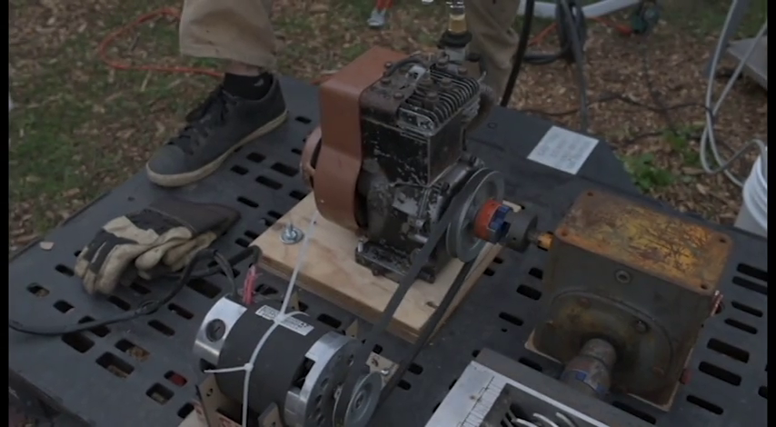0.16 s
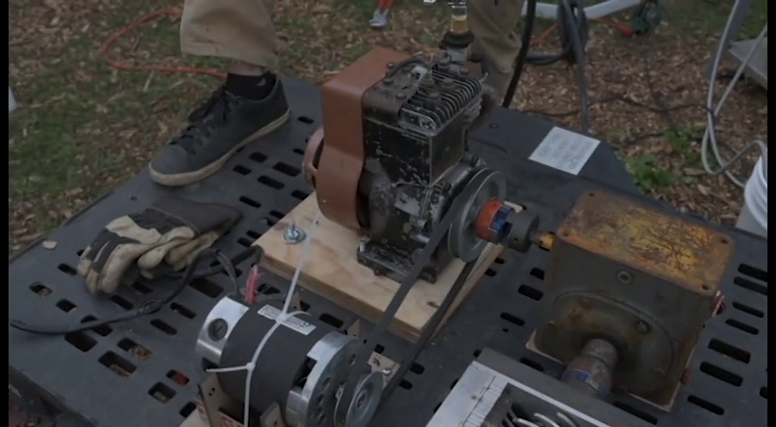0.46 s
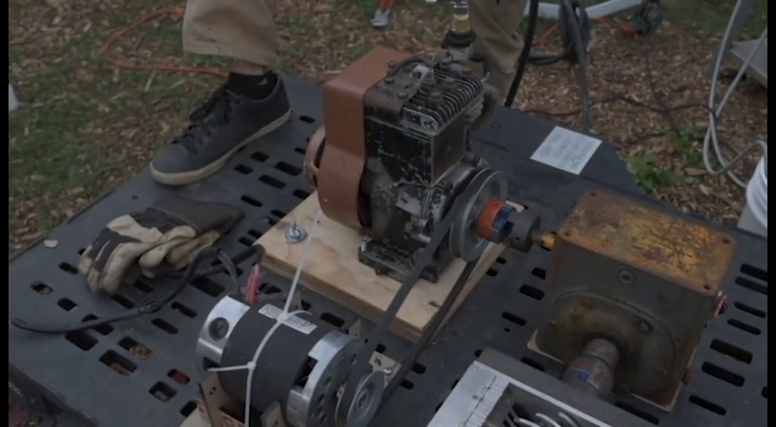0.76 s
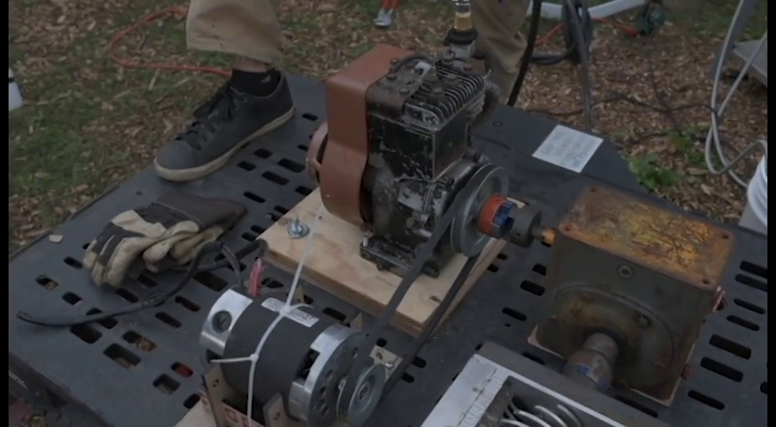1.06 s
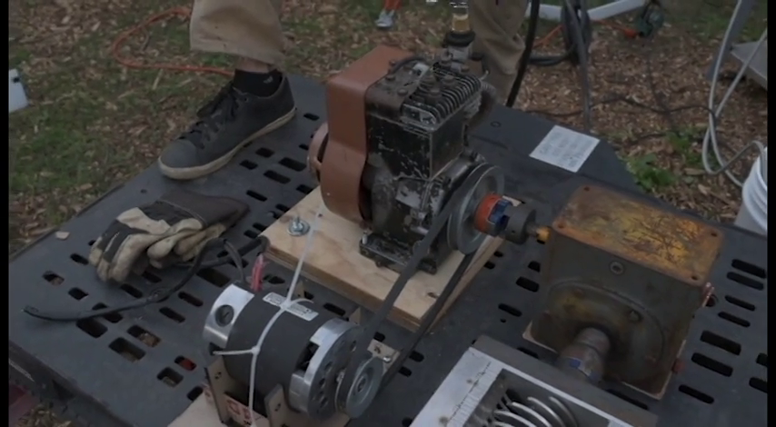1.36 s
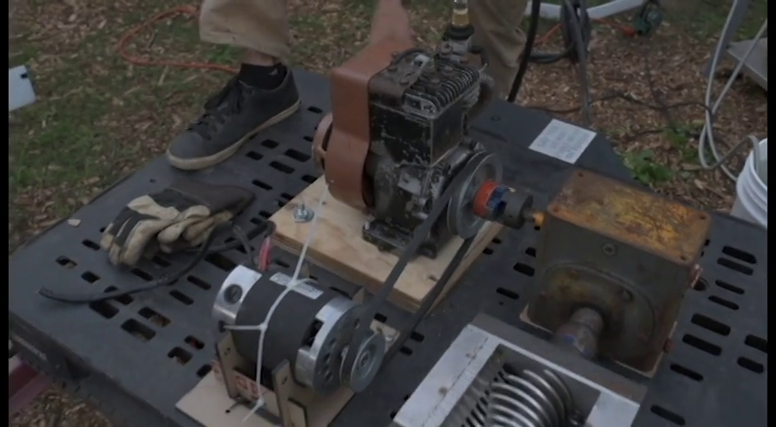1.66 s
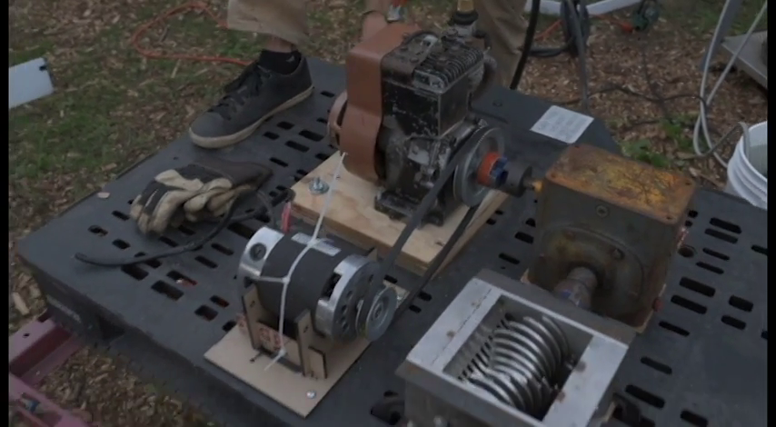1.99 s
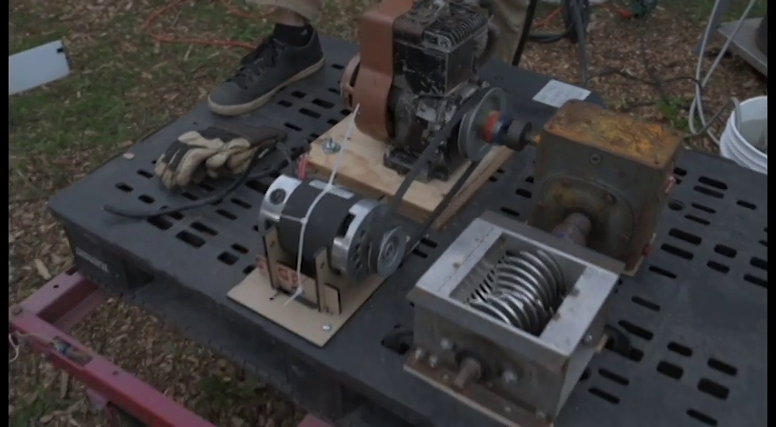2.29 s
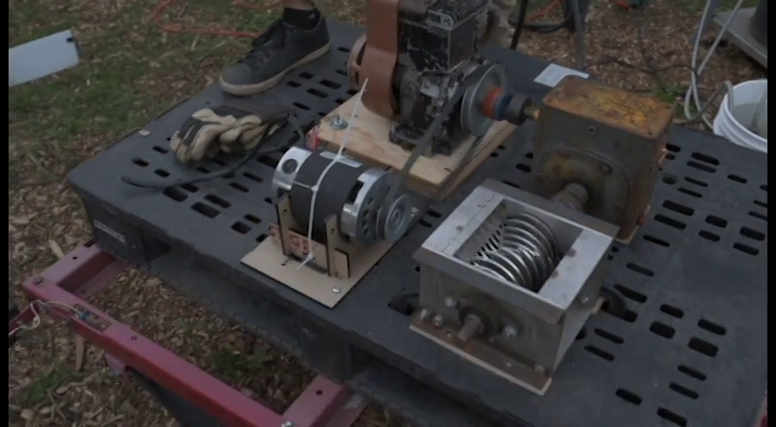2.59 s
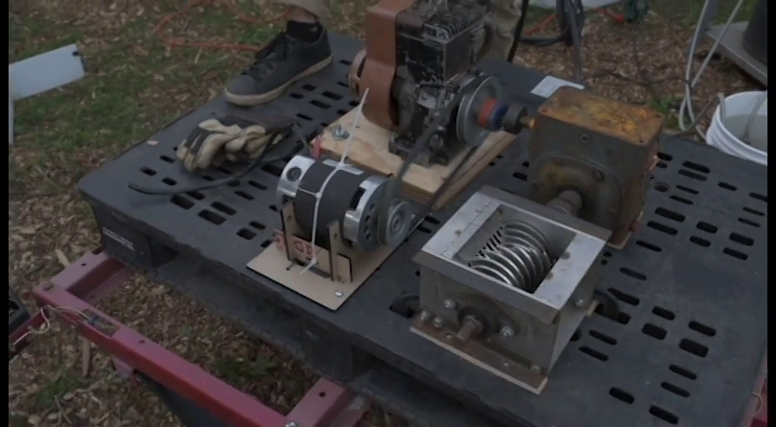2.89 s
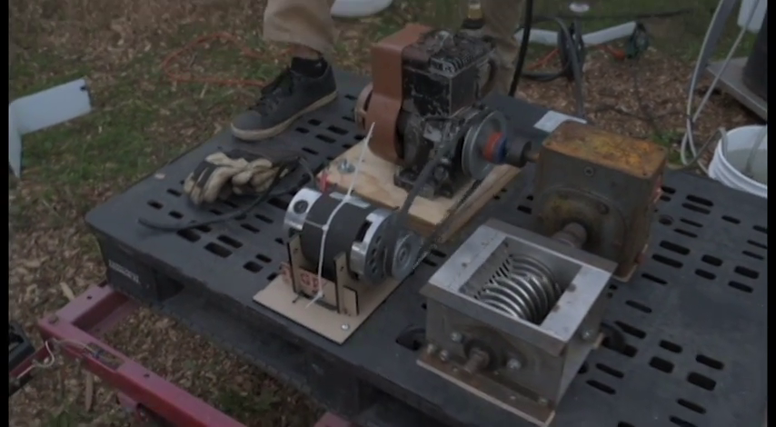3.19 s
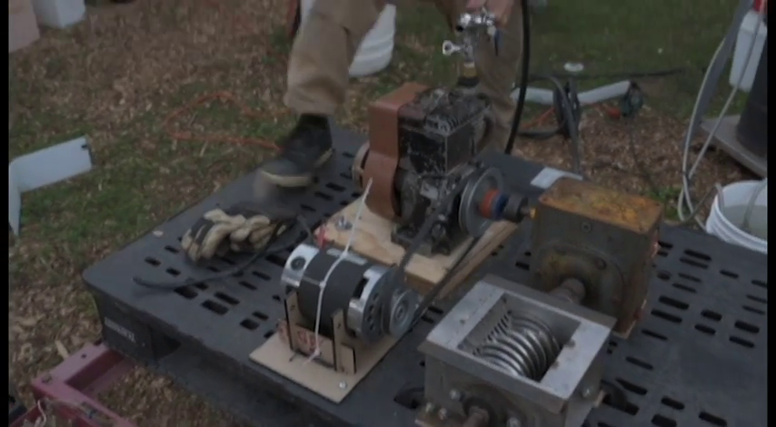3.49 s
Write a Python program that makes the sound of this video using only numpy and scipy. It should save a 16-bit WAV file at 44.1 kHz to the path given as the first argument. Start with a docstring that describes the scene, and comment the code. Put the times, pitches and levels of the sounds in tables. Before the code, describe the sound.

A small one-cylinder engine on a plastic pallet scrapes and clunks to rest at 0.1 s, with small clicks until 0.35. Quiet yard wash until 1.3, then dry valve clicks on the left over faint growing hiss and light knocks. From 2.4 it catches: ticking, bright air puffs with weak low thuds, quickening from about six to eighteen per second, over loud metallic clatter, still running at 3.65.

```python
"""The last scrape and clunk of a small one-cylinder engine on a plastic pallet, in a quiet yard.
A hand then clicks a valve open on the left: dry noise clicks over a faint, growing hiss.
Knocks shake resonances of the frame; the engine catches and speeds up, each turn giving a noise tick,
a puff of coloured noise and a decaying sine thud, over clatter, air hiss and rumble."""
import sys
import numpy as np
from scipy import signal
from scipy.fft import rfft, irfft
from scipy.io import wavfile
from scipy.ndimage import uniform_filter1d

SR = 44100
rng = np.random.default_rng(int(sys.argv[2]) if len(sys.argv) > 2 else 0)


def to_wav(sig):
    """Store sig (one row per channel, or 1-D mono) as 16-bit WAV at the path in sys.argv[1].

    Samples outside -1..1 are clipped; the rate is SR.
    """
    pcm = np.clip(np.atleast_2d(sig), -1, 1) * 32767
    pcm = np.round(pcm).astype(np.int16)
    wavfile.write(sys.argv[1], SR, pcm.T)  # frames by channels


N = 160965

# Yard wash spectrum: (frequency [Hz], relative density [dB per Hz])
YARD_SPECTRUM = [(25, -39), (64, -10), (200, 5.5), (530, 4), (940, -0.5), (1300, -4), (2000, -14),
                 (11000, -25), (16000, -47.5)]
# Left-right likeness of the wash: (frequency [Hz], likeness [0-1])
YARD_LIKENESS = [(60, 1), (500, 0.77), (5000, 0.033)]
# Distant hum: (frequency [Hz], level [dB rms])
HUM_TONES = [(538.3, -79.5), (597.5, -82.5), (904.4, -86.5)]
# Hiss while the valve opens: (time [s], level [dB])
LEAK_LEVEL = [(1.05, -82.5), (1.4, -70.5), (2.0, -68), (2.2, -69), (2.33, -58)]
# Valve hiss spectrum: (frequency [Hz], relative density [dB per Hz])
LEAK_SPECTRUM = [(900, -8), (1500, -8.5), (3700, -15), (5900, -19.5), (9500, -19), (16000, -35)]
# Valve and linkage clicks: (time [s], nominal level [dB], pitch [Hz], nominal pan to the left [dB])
VALVE_CLICKS = [(0.223, -47, 4800, 7), (0.3, -40, 4600, 4), (0.3167, -35.5, 6000, 4),
                (0.345, -48.5, 3180, 4), (1.3386, -48.5, 2740, 19.5), (1.4252, -38, 4900, 13),
                (1.5348, -38, 7860, 24), (1.6344, -36.5, 8100, 13), (1.726, -33, 8150, 17),
                (1.8208, -33, 3220, 11), (1.9119, -27.5, 7700, 15), (1.923, -30.5, 7740, 12),
                (2.1056, -26.5, 8100, 14), (2.1122, -21.5, 7800, 17), (2.335, -22.5, 7550, 15)]
# Last scrape before rest: (time [s], low level [dB], treble level [dB])
COAST_LEVEL = [(0, -48.5, -54.5), (.035, -48.5, -45), (.07, -53, -58), (.088, -46, -36.5), (.108, -47, -53),
               (.15, -38.5, -45.5), (.2, -59.5, -69.5), (.3, -73, -78.5)]
# Scrape spectrum: (frequency [Hz], relative density [dB per Hz])
SCRAPE_SPECTRUM = [(150, -27.5), (450, -15.5), (650, -3.5), (1300, -6.5), (2600, -12.5), (3200, -13),
                   (9500, -20), (16000, -39.5)]
# Shaft drop and bounce: (time [s], nominal level [dB])
SHAFT_DROPS = [(0.115, -12), (0.145, -44.5)]
# Modes rung by each drop: (frequency [Hz], level at the first drop [dB], t60 [s])
CLUNK_MODES = [(635, -33.5, 0.28), (1110, -19, 0.039), (1472, -27, 0.12), (2267, -28.5, 0.12),
               (2936, -31, 0.069), (982, -51, 0.15)]
# Creaks of rubbing metal: (middle [s], level [dB], pitch [Hz], half length [s])
METAL_CREAKS = [(1.777, -66, 2400, 0.014), (2.464, -33.5, 2796, 0.027)]
# Blows to the frame: (time [s], nominal level [dB], treble re that [dB], rattle t60 [s])
FRAME_KNOCKS = [(1.31, -46.5, -30, 0.051), (1.372, -49.5, -35, 0.07), (1.822, -51.5, 3.5, 0.12),
                (1.946, -35.5, -14, 0.078), (2.001, -37.5, -21, 0.12), (2.123, -42, 7.5, 0.035),
                (2.146, -38, -4, 0.076), (2.174, -27.5, -6, 0.1), (2.203, -48, -29, 0.069),
                (2.241, -22.5, -19, 0.09), (2.328, -34.5, -11.5, 0.19), (2.37, -25, -7.5, 0.31),
                (2.447, -30, 4, 0.4), (2.534, -20.5, -8.5, 0.1), (2.572, -25, -5.5, 0.35),
                (2.64, -26.5, 6.5, 0.091), (2.703, -16, -2, 0.11), (2.882, -24.5, 1, 0.27),
                (2.942, -24.5, -5, 0.26), (2.98, -21, 2.5, 0.17), (3.065, -23, 1.5, 0.19),
                (3.162, -11, -4.5, 0.1), (3.233, -14, -6.5, 0.077), (3.297, -13.5, -4.5, 0.14),
                (3.377, -18.5, 1, 0.082), (3.437, -9.5, -1.5, 0.022), (3.487, -25.5, 6.5, 0.22),
                (3.555, -22.5, -2, 0.22)]
# Frame and board resonances: (frequency [Hz], nominal width [Hz], gain [dB])
FRAME_MODES = [(254, 280, -8.5), (623.4, 130, 5.5), (920, 71, 2), (1298, 234, 3.5), (2390, 140, -5.5),
               (3140, 230, -5.5)]
# Running noise: (time [s], clatter level [dB], air hiss level [dB], rumble level [dB])
RUN_LEVEL = [(2.3, -62.5, -93, -90), (2.35, -53, -50.5, -62), (2.5, -37, -44.5, -69),
             (2.66, -35.5, -38.5, -47.5), (2.735, -29, -35, -43), (2.76, -36, -46, -52),
             (2.86, -31, -34, -48.5), (3.2, -32, -33, -45.5), (3.65, -29.5, -34.5, -35)]
# Running noise spectra: (frequency [Hz], relative density [dB per Hz])
CLATTER_SPECTRUM = [(150, -23), (600, 1), (1500, 12), (3000, 4.5), (6000, -3.5), (9000, -24)]
AIR_SPECTRUM = [(2000, -17.5), (3200, -9), (5750, -13), (6800, -11.5), (9600, -12), (12000, -16.5),
                (16000, -26)]
RUMBLE_SPECTRUM = [(25, -47), (110, -25), (185, 0.5), (290, 1), (450, -12.5), (700, -53)]
# Exhaust puffs, one per turn: (time [s], nominal hiss level [dB], tick offset [dB], thud level [dB])
EXHAUST_PUFFS = [(2.3952, -30.5, 32.5, -64), (2.5597, -8.5, 7, -37), (2.683, -9, 12, -44.5),
                 (2.8056, -8.5, 9, -39), (2.9137, -10, 5, -36), (3.0114, -9, 1, -38), (3.0984, -11, 5, -38),
                 (3.177, -10.5, -13, -39), (3.254, -10, -30, -33.5), (3.3232, -9.5, -26, -32.5),
                 (3.3872, -11, -22, -30), (3.4476, -11, -30, -31), (3.5034, -13.5, -21, -35),
                 (3.5588, -14.5, -16, -31), (3.6146, -12, -36, -49)]
# Left-right likeness of the machine: (frequency [Hz], likeness [0-1])
MACHINE_LIKENESS = [(60, .75), (150, .8), (600, .93), (1700, .84), (5000, .58), (14000, .05)]

YARD_DB = -68.5
WHINE_HZ, WHINE_SAG_HZ_PER_S, WHINE_DB = 5480, 200, -88
WHINE_MID_S, WHINE_HALF_S = 1.5, 0.4
LEAK_PAN_DB = 2.5
CLICK_WIDE_DB, CLICK_Q = -2, 5
CLICK_T60_S, CLICK_TAIL_DB, CLICK_TAIL_T60_S = 0.0056, -18.5, 0.038
CLUNK_T60_S, CLUNK_CRACK_DB = 0.055, 20
KNOCK_RISE_S, RUNNING_RISE_S, RUNNING_FROM_S = 0.0015, 0.003, 2.4
KNOCK_DETUNE_RATIO, KNOCK_SHIFT_DB = 0.06, 3.5
THUD_HZ, THUD_T60_S = 103.4, 0.091
CLACKS_PER_S, CLACK_SPREAD_DB, RING_DB, GRIND_DB = 700, 2.5, -2, -1.5
PUFF_RISE_S, PUFF_T60_S, PUFF_LAG_S = 0.00039, 0.16, 0.0017
PUFF_BASE_HZ, PUFF_HZ_PER_TURN_PER_S = 7620, 156  # hiss pitch rises with speed
PUFF_WIDTH_HZ, PUFF_WIDE_DB = 3800, -8.5
SNAP_DB, SNAP_T60_S = -14, 0.061
TICK_HZ, TICK_WIDTH_HZ, TICK_T60_S = 4820, 1600, 0.022
SQUEAK_HZ, SQUEAK_WIDTH_HZ, SQUEAK_DB = 6900, 800, -31
SQUEAK_TURN_SHARE, SQUEAK_HALF_S, SQUEAK_FROM_S = 0.44, 0.005, 3.05
PATCH_DB, RAGGED_DB = 2.5, 2.2
CEILING, EDGE_HZ = 0.36, 16000


def amp(db):
    """Amplitude ratio from dB."""
    return 10 ** (np.asarray(db) / 20)


def evened(x):
    """Signal scaled to rms 1."""
    return x / np.sqrt(np.mean(x ** 2) + 1e-20)


def read(points, hz):
    """Curve value, interpolated on log frequency."""
    f, value = np.transpose(points)
    return np.interp(np.log(hz + 1), np.log(f + 1), value)


def level(table, column):
    """Gain along a dB curve; virtually silent outside it."""
    rows = np.transpose(table)
    return amp(np.interp(np.arange(N) / SR, rows[0], rows[column], -150, -150))


def colour(x, points):
    """Sound filtered by a spectrum; rms 1."""
    length = x.shape[-1]
    gain = amp(read(points, np.fft.rfftfreq(length, 1 / SR)))
    return evened(irfft(rfft(x) * gain, length))


def ring(x, hz, width_hz):
    """Two-pole resonance of peak gain 1."""
    b, a = signal.iirpeak(min(hz, 0.45 * SR), hz / width_hz, SR)
    return signal.lfilter(b, a, x)


def band(x, hz, width_hz):
    """Two equal resonances in series; rms 1."""
    return evened(ring(ring(x, hz, width_hz), hz, width_hz))


def burst(start_s, db, rise_s, t60_s):
    """Envelope: linear rise times exponential decay."""
    out, start = np.zeros(N), round(start_s * SR)
    t = np.arange(min(N - start, round(2 * t60_s * SR))) / SR
    out[start:start + len(t)] = np.minimum(t / rise_s, 1) * amp(db - 60 * t / t60_s)
    return out


def ragged():
    """Random gain varying over about two milliseconds; rms 1."""
    wander = evened(uniform_filter1d(rng.standard_normal(N), size=90))
    return evened(amp(RAGGED_DB * wander))


def patchy(x):
    """Colour shifting in random patches of time and frequency."""
    z = signal.stft(x, nperseg=256)[2]
    patches = uniform_filter1d(rng.standard_normal(z.shape), size=4, axis=0)
    patches = evened(uniform_filter1d(patches, size=5, axis=1))
    return signal.istft(z * amp(PATCH_DB * patches), nperseg=256)[1][:N]


def spread(x, other, likeness):
    """Two microphone ports: mid and side mixed by likeness at each frequency."""
    c = np.clip(read(likeness, np.fft.rfftfreq(N, 1 / SR)), 0, 1)
    mid = np.sqrt((1 + c) / 2) * rfft(x)
    side = np.sqrt((1 - c) / 2) * rfft(other)
    return irfft(np.array([mid + side, mid - side]), N)


def frame(x, bright, detune, shift_db):
    """Engine frame and board: parallel resonances, the upper ones driven by the bright part of a blow."""
    between = np.sqrt(abs(x * bright)) * np.sign(x)
    drives = [x, x, x, between, bright, bright]
    out = 0
    for k, (hz, width_hz, db) in enumerate(FRAME_MODES):
        mode_hz = hz * (1 + detune[k])
        mode = ring(ring(drives[k], mode_hz, width_hz), mode_hz, 2 * width_hz)
        out = out + (-1) ** k * amp(db + shift_db[k]) * mode
    return out


def yard_wash():
    """Distant wash: coloured noise, most alike left and right in the bass."""
    a, b = rng.standard_normal((2, N))
    return amp(YARD_DB) * spread(colour(a, YARD_SPECTRUM), colour(b, YARD_SPECTRUM), YARD_LIKENESS)


def hum_and_whine():
    """Distant hum of narrow noise bands; thin sine whine sinking in pitch, its level unsteady."""
    noise = rng.standard_normal(N)
    hum = sum(amp(db) * band(noise, hz, 4.8) for hz, db in HUM_TONES)
    t = np.arange(N) / SR - WHINE_MID_S
    cycles = WHINE_HZ * t - WHINE_SAG_HZ_PER_S * t ** 2 / 2
    flutter = 1 + evened(uniform_filter1d(noise, size=400))
    swell = np.exp(-(t / WHINE_HALF_S) ** 4)
    return hum + amp(WHINE_DB) * swell * np.sin(2 * np.pi * cycles) * flutter


def valve_leak():
    """Hiss at the opening valve: partly shared noise, louder on the left."""
    c, d = rng.standard_normal((2, N))
    hiss = colour(np.array([c, 0.5 * c + d]), LEAK_SPECTRUM)
    return level(LEAK_LEVEL, 1) * hiss * amp([[LEAK_PAN_DB / 2], [-LEAK_PAN_DB / 2]])


def clicks():
    """Valve clicks: short resonant noise with a faint tail, panned left."""
    noise, out = rng.standard_normal(N), np.zeros((2, N))
    wide = band(noise, 4700, 8700)
    for s, db, hz, pan_db in VALVE_CLICKS:
        tone = band(noise, hz, hz / CLICK_Q) + amp(CLICK_WIDE_DB) * wide
        shape = burst(s, db - 8.5, 0.0001, CLICK_T60_S)
        shape += burst(s, db + CLICK_TAIL_DB, 0.0028, CLICK_TAIL_T60_S)
        out += shape * tone * amp([[pan_db / 4], [-pan_db * 0.9]])
    return out


def scrape():
    """Dying scrape: low and treble noise, each on its own level curve."""
    a, b = rng.standard_normal((2, N))
    low = colour(a, SCRAPE_SPECTRUM[:5] + [(4000, -41.5)])
    high = colour(b, [(1800, -41)] + SCRAPE_SPECTRUM[4:])
    return patchy(level(COAST_LEVEL, 1) * low + level(COAST_LEVEL, 2) * high)


def clunk():
    """Shaft dropping to rest and bouncing: decaying sine modes plus a resonant noise crack."""
    noise, t = rng.standard_normal(N), np.arange(N) / SR
    blow, modes = np.zeros((2, N))
    for s, db in SHAFT_DROPS:
        blow += noise * burst(s, db - 23.5, 0.00036, CLUNK_T60_S)
        for hz, mode_db, t60_s in CLUNK_MODES:
            shape = burst(s, db - SHAFT_DROPS[0][1] + mode_db, 0.002, t60_s)
            modes += shape * np.sin(2 * np.pi * (hz * t + rng.random()))
    return modes + amp(CLUNK_CRACK_DB) * ring(ring(blow, 1600, 4000), 1600, 4000)


def creaks():
    """Rubbing metal: narrow noise bands under bell-shaped envelopes."""
    noise, t = rng.standard_normal(N), np.arange(N) / SR
    return sum(amp(db) * np.exp(-((t - s) / half_s) ** 2) * band(noise, hz, hz / 10)
               for s, db, hz, half_s in METAL_CREAKS)


def knocks():
    """Noise bursts drive frame resonances, randomly detuned and re-levelled per blow; bright edge added."""
    low, high = rng.standard_normal((2, N)) * ragged()
    variation = rng.uniform(-0.95, 1, (len(FRAME_KNOCKS), 2, len(FRAME_MODES)))
    body, edge = np.zeros((2, N))
    for (s, db, treble_db, t60_s), (detune, shift) in zip(FRAME_KNOCKS, variation):
        rise_s = RUNNING_RISE_S if s > RUNNING_FROM_S else KNOCK_RISE_S
        shape = burst(s, db - 4, rise_s, t60_s)
        part = slice(round(s * SR), round((s + 0.5) * SR))
        shake = (low * shape)[part]
        bright = shake * 2 * amp(treble_db)
        body[part] += frame(shake, bright, KNOCK_DETUNE_RATIO * detune, KNOCK_SHIFT_DB * shift)
        edge += amp(treble_db) * shape
    still = np.zeros(len(FRAME_MODES))
    return body / np.std(frame(low, low, still, still)) + band(high, 3150, 7500) * edge


def running_noise():
    """Frame and gear clatter from random impulses, with noise air hiss and rumble."""
    grain, air, low = rng.standard_normal((3, N))
    heights = amp(CLACK_SPREAD_DB * np.minimum(rng.exponential(1, N), 5))
    hits = heights * (rng.random(N) < CLACKS_PER_S / SR)
    clacks = evened(hits * np.sign(grain)) + 0.5 * grain
    still = np.zeros(len(FRAME_MODES))
    clatter = amp(RING_DB) * evened(frame(clacks, clacks, still, still))
    clatter += amp(GRIND_DB) * colour(clacks, CLATTER_SPECTRUM)
    bed = level(RUN_LEVEL, 1) * clatter + level(RUN_LEVEL, 2) * colour(air, AIR_SPECTRUM)
    return patchy(bed) + level(RUN_LEVEL, 3) * colour(low, RUMBLE_SPECTRUM)


def thuds():
    """One low decaying sine push per turn."""
    t = np.arange(N) / SR
    return sum(burst(s, db, 0.0037, THUD_T60_S) * np.sin(2 * np.pi * THUD_HZ * (t - s))
               for s, _, _, db in EXHAUST_PUFFS)


def puffs():
    """Per turn: tick, snap and exhaust hiss from noise bands; later turns also squeak."""
    noise = rng.standard_normal((4, N))
    wide = colour(noise[0], AIR_SPECTRUM)
    tick = band(noise[1], TICK_HZ, TICK_WIDTH_HZ)
    squeak = band(noise[2], SQUEAK_HZ, SQUEAK_WIDTH_HZ)
    t, out = np.arange(N) / SR, np.zeros(N)
    turns_s = np.gradient(np.transpose(EXHAUST_PUFFS)[0])
    for (s, db, tick_db, _), turn_s in zip(EXHAUST_PUFFS, turns_s):
        hiss_hz = PUFF_BASE_HZ + PUFF_HZ_PER_TURN_PER_S / turn_s
        hiss = band(noise[3], hiss_hz, PUFF_WIDTH_HZ) + amp(PUFF_WIDE_DB) * wide
        out += burst(s + PUFF_LAG_S, db - 11.5, PUFF_RISE_S, PUFF_T60_S) * hiss
        out += burst(s - PUFF_LAG_S / 2, db + tick_db - 18, 0.00062, TICK_T60_S) * tick
        out += burst(s, db + SNAP_DB, 0.0013, SNAP_T60_S) * hiss
        if s > SQUEAK_FROM_S:
            middle_s = s + SQUEAK_TURN_SHARE * turn_s
            out += amp(SQUEAK_DB) * np.exp(-((t - middle_s) / SQUEAK_HALF_S) ** 2) * squeak
    return ragged() * out


def machine():
    """Sum of the engine sounds that share one stereo likeness."""
    return scrape() + clunk() + creaks() + knocks() + running_noise() + puffs()


def scene():
    """Yard, valve and engine; two machine draws give the stereo width."""
    background = yard_wash() + hum_and_whine() + valve_leak()
    return background + clicks() + thuds() + spread(machine(), machine(), MACHINE_LIKENESS)


def record(dry):
    """Soft tanh ceiling, then a linear-phase low-pass."""
    soft = CEILING * np.tanh(dry / CEILING)
    lowpass = signal.firwin(511, EDGE_HZ, window=("kaiser", 9), fs=SR)
    return signal.oaconvolve(soft, lowpass[None], "same")


dry = scene()
out = record(dry)
to_wav(out)
```